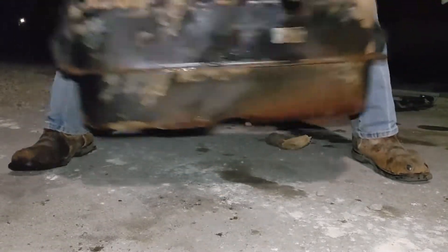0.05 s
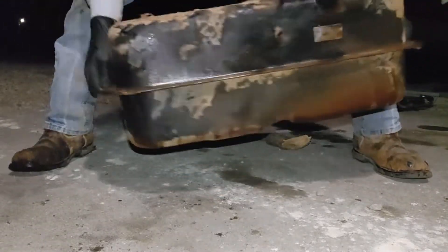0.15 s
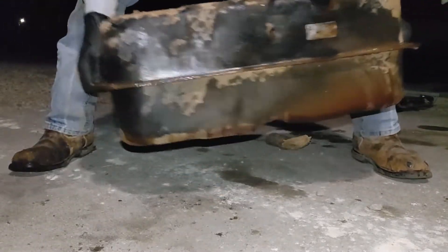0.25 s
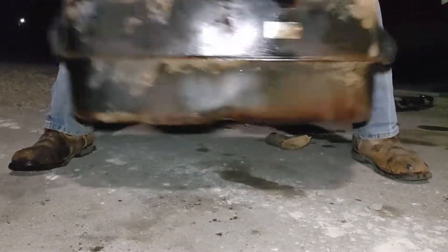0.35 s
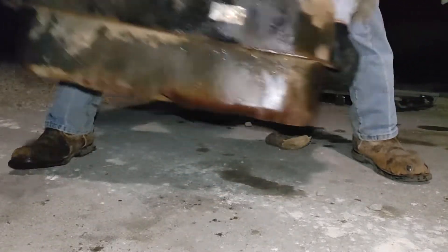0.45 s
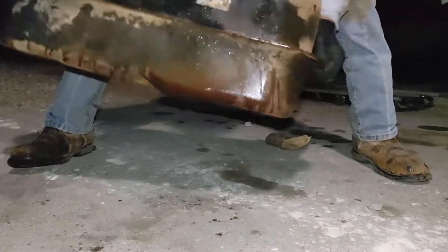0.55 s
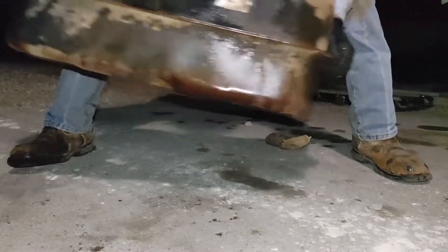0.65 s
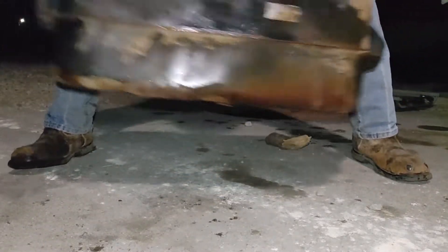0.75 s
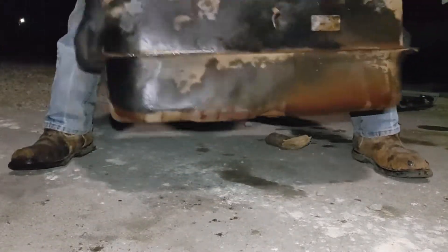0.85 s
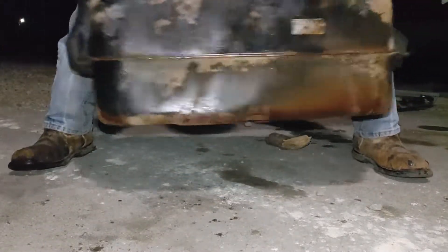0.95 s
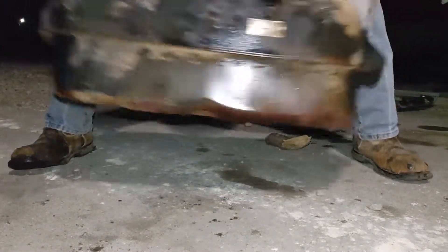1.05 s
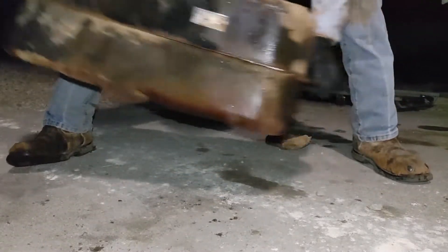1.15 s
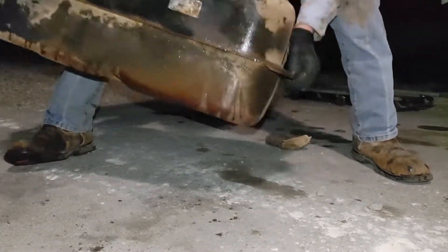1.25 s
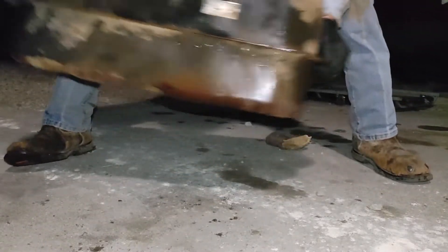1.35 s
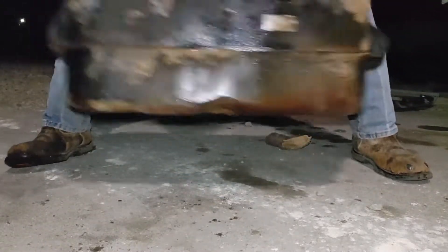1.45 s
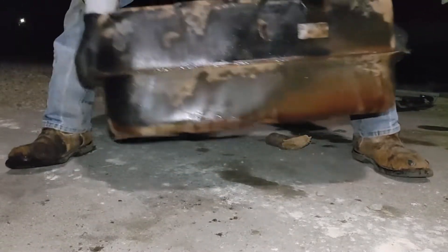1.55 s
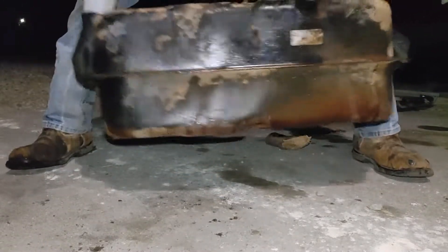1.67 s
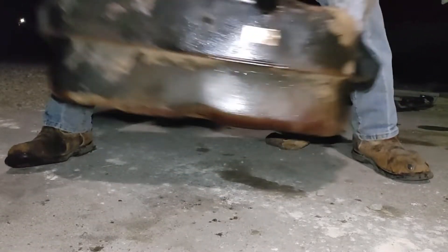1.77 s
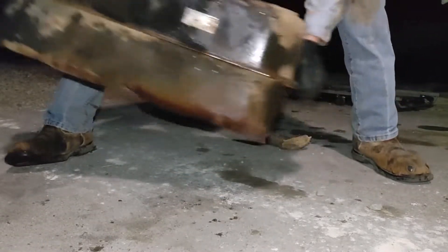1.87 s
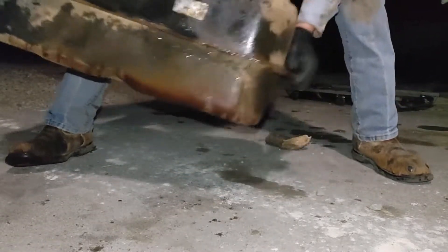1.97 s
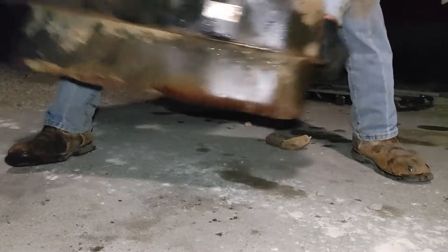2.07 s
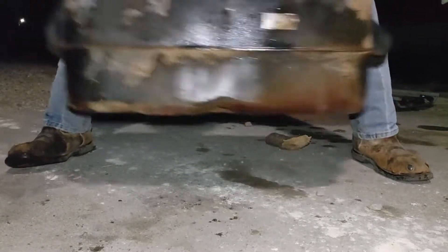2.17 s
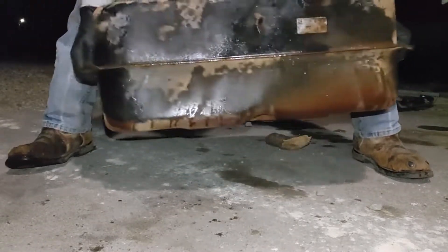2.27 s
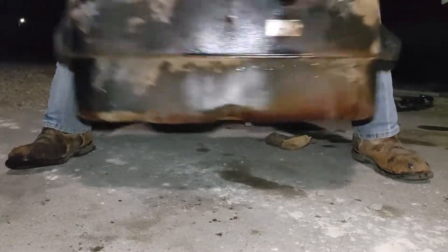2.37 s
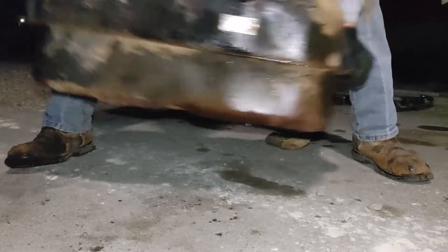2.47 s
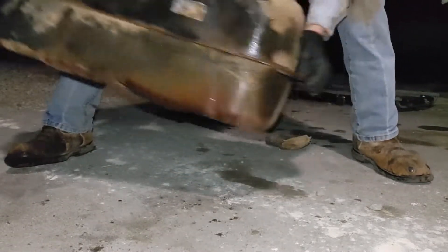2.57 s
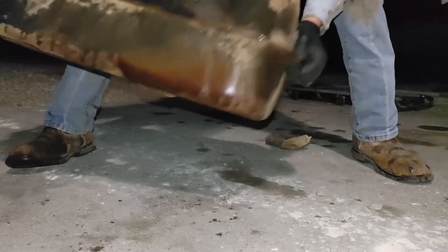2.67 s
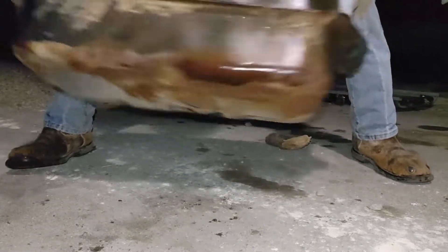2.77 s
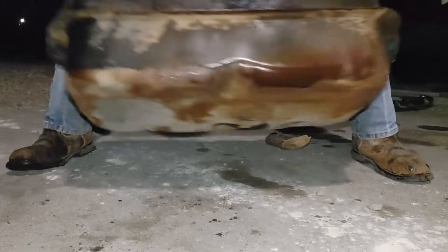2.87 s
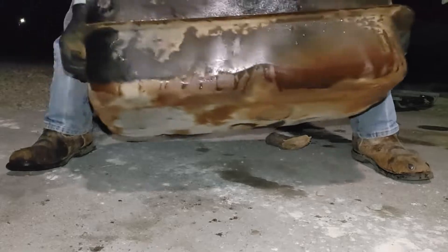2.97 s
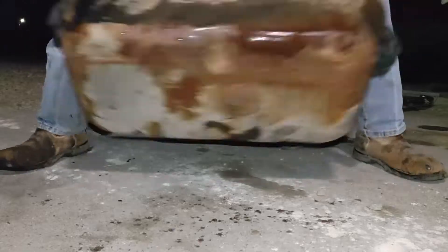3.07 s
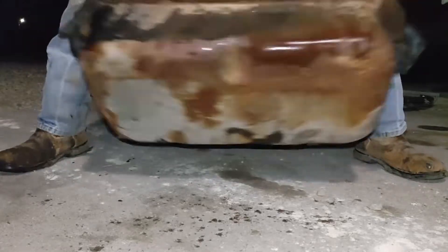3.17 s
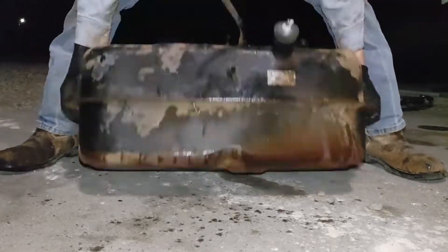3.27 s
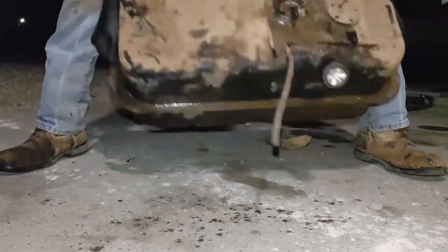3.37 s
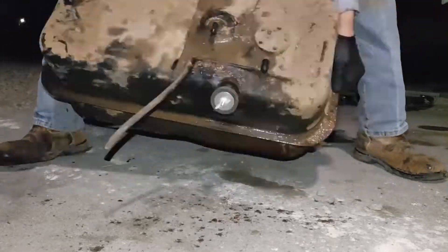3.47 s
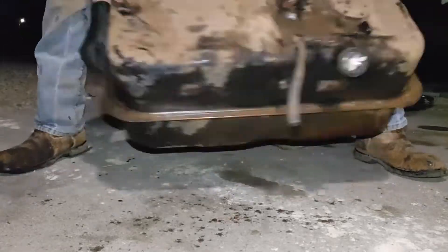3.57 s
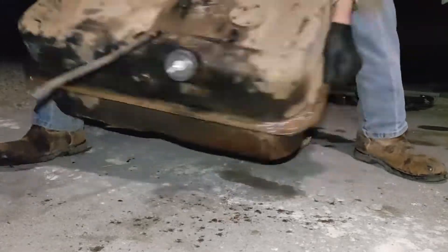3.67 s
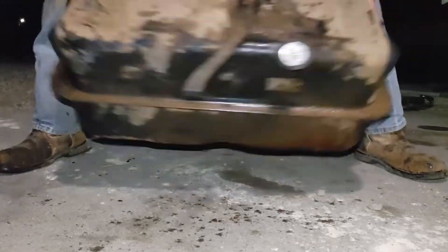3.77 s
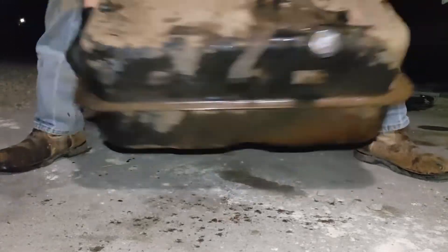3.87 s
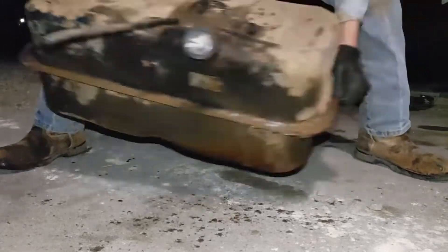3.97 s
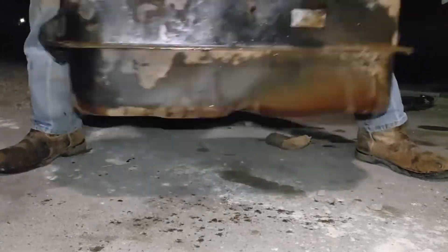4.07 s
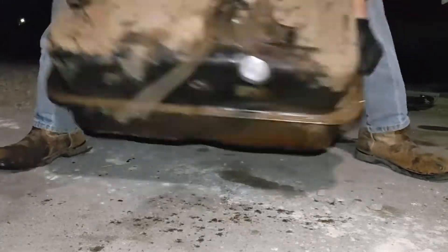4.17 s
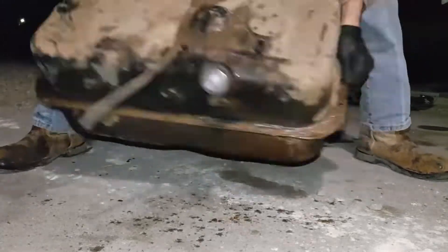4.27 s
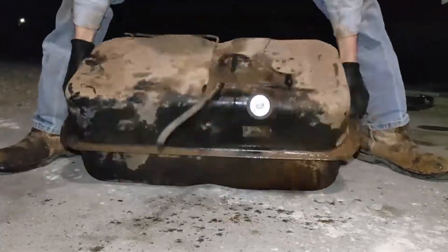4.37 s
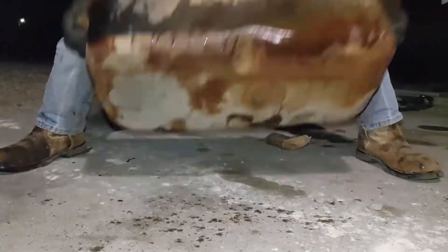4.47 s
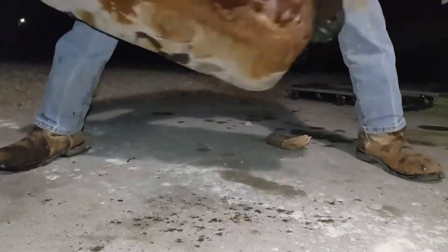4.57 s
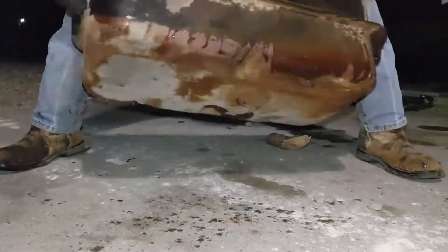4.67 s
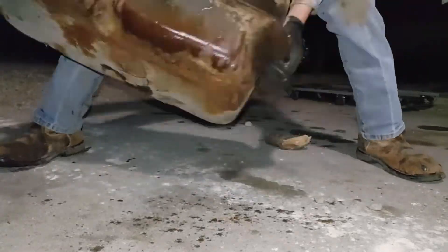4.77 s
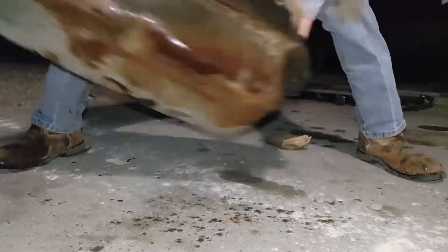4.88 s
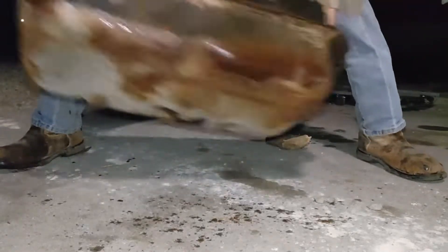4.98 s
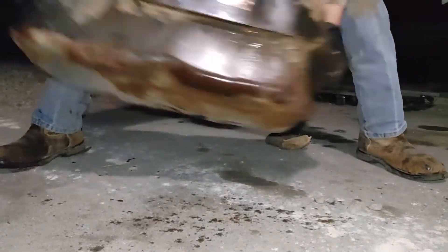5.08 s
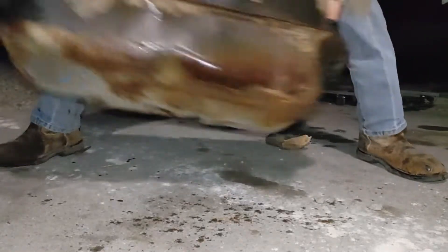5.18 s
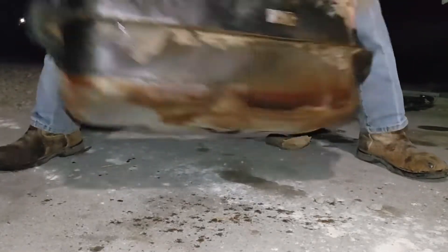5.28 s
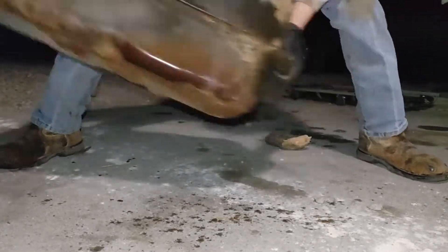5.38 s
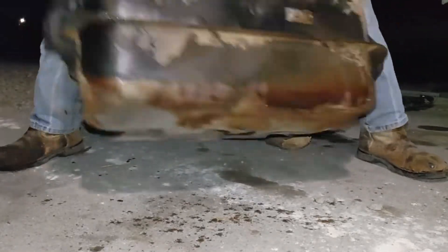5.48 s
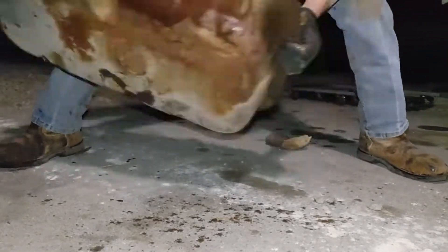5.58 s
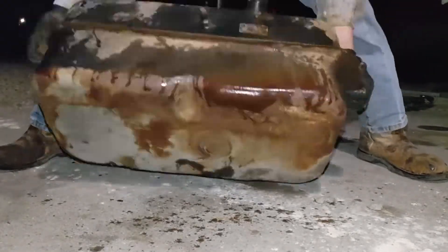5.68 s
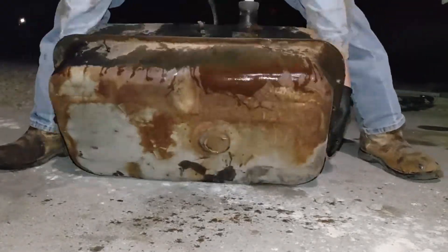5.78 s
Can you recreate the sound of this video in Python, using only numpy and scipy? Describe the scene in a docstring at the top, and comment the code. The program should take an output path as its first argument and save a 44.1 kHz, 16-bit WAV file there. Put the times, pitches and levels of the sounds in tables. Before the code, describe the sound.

A steel tank is swung slowly with liquid gulping and loose screws clacking inside, then shaken in a fast blurred rattle broken by dull knocks.

```python
"""A workshop, where a steel fuel tank holding liquid and loose screws is shaken by hand.
For three seconds it swings slowly: liquid gulps in the hollow, screws slide and clack on the walls.
Then the shaking races by in fast motion, a quick diffuse rattle, broken by dull knocks as the tank is turned over.
Liquid is filtered clouds of short rings plus single gulps; sliding screws are showers of tiny contacts on steel.
Clacks, clanks, thrown liquid and knocks are struck modes and noise, each placed at its own moment."""
import sys
import numpy as np
from scipy import signal
from scipy.fft import rfft, irfft, next_fast_len
from scipy.io import wavfile
from scipy.ndimage import uniform_filter1d

SR = 44100
rng = np.random.default_rng(int(sys.argv[2]) if len(sys.argv) > 2 else 0)


def wav_out(sig):
    """Save sig, one row per channel (or a flat mono array), as 16-bit PCM at SR to the path in sys.argv[1]."""
    wavfile.write(sys.argv[1], SR, np.round(np.clip(np.atleast_2d(sig).T, -1, 1) * 32767).astype(np.int16))


N = 257103
FAST_FROM_S = 3.02  # middle of the crossfade from slow swings to fast motion
TOP_HZ = 16100  # the band ends here

# Levels in the tables are relative: each source sets its final gain.

# Rumble of the heavy tank in fast motion and over the quiet room. Each row: frequency in Hz, density in dB per Hz.
RUMBLE_SPECTRUM = [(20, -8), (45, -6.5), (90, -2.5), (160, 0), (400, -52), (2000, -83), (16000, -77)]
# Low surge of the liquid in slow swings. Each row: frequency in Hz, density in dB per Hz.
SURGE_SPECTRUM = [(25, -34), (60, -20), (90, 12), (125, -13), (250, 0), (2000, -44)]

# Slow swings that send the liquid across the tank.
# Each row: start in seconds, length in seconds, slosh level in dB, splash level in dB.
SWINGS = [(0.003, 0.2, -27.5, -32.5), (0.3, 0.097, -29.5, -35), (0.71, 0.074, -27.5, -37),
          (0.951, 0.14, -24.5, -32), (1.399, 0.068, -27, -33.5), (1.628, 0.28, -27, -33.5),
          (2.093, 0.075, -24.5, -33), (2.316, 0.16, -27, -33.5), (2.754, 0.12, -27.5, -35.5),
          (3.005, 0.012, -31.5, -36.5)]
# How slosh, then splash, follow a swing. Each row: build-up in dB per second, settling in dB per second.
LIQUID_INERTIA = [(85, 48), (100, 65)]
# The liquid keeps moving between swings. One row: slosh level in dB, splash level in dB.
IDLE_LIQUID_DB = [-35.5, -45.5]
# The heap of screws slides as the floor tilts. Each row: start in seconds, length in seconds, level in dB.
SLIDES = [(-0.004, 0.24, -38), (0.29, 0.15, -39.5), (0.624, 0.17, -41), (0.945, 0.2, -37),
          (1.184, 0.18, -40.5), (1.4, 0.098, -40), (1.63, 0.21, -39.5), (1.875, 0.21, -40),
          (2.083, 0.083, -37), (2.323, 0.22, -39.5), (2.63, 0.49, -39)]
SLIP_DB_PER_S, GRIP_DB_PER_S = 133, 156  # a slide starts and stops
ROLL_DB = -46.5  # stragglers roll on
# Bouts of fast shaking, one group of rows each. Each row: time in seconds, liquid level in dB, screws level in dB.
BOUTS = [
    [(3.02, -31, -35.5), (3.24, -30.5, -38.5)],
    [(3.395, -31.5, -41.5), (3.5, -36.5, -34.5), (3.7, -30, -34), (3.92, -31, -33.5), (4.17, -29.5, -37),
     (4.32, -35, -37.5)],
    [(4.48, -30, -38), (4.75, -30, -33.5), (5.08, -26, -34), (5.3, -28, -34.5), (5.62, -27.5, -33.5),
     (5.692, -38, -41.5)],
]
START_DB_PER_S, STOP_DB_PER_S, REST_DB = 906, 694, -59  # a bout starts and stops; what stirs between bouts
CHURN_DB, SPLASH_DB = -2.5, -5.5  # fast shaking: churn against the bout's liquid level, splash against churn

# Liquid in the hollow during slow swings. Each row: frequency in Hz, density in dB per Hz.
HOLLOW_SPECTRUM = [(30, -70), (60, -24), (95, -26.5), (130, -24), (180, -8), (240, -4.5), (280, 0),
                   (320, -2.5), (420, -3.5), (600, -7), (900, -22.5), (1600, -34)]
# Liquid churning between throws in fast motion. Each row: frequency in Hz, density in dB per Hz.
CHURN_SPECTRUM = [(30, -49), (60, -15), (130, -20.5), (180, -9), (240, -4.5), (280, 0), (420, -3.5),
                  (600, -6.5), (900, -15), (1600, -43)]
# Spray and wet slaps. Each row: frequency in Hz, density in dB per Hz.
SPLASH_SPECTRUM = [(300, -6.5), (600, 0.5), (1000, -3.5), (1300, -5.5), (2000, -4.5), (4000, -29),
                   (9000, -54)]
# Single heavy gulps in the hollow.
# Each row: centre in seconds, level in dB, pitch at the centre in Hz, half width (sigma) in seconds.
GULPS = [(0.04, -25, 286, 0.013), (0.082, -21, 282, 0.02), (0.155, -28, 227, 0.014),
         (0.179, -27.5, 298, .01), (0.254, -25, 282, 0.0058), (0.37, -27.5, 332, 0.01),
         (0.438, -22, 268, 0.0099), (0.625, -28, 255, 0.012), (0.709, -25.5, 282, 0.0091),
         (0.767, -22, 276, 0.0099), (0.835, -25, 287, 0.0077), (0.938, -24.5, 286, .012),
         (1.017, -25, 340, 0.0073), (1.05, -41, 90, 0.018), (1.097, -20.5, 282, 0.019),
         (1.125, -38, 92, .012), (1.153, -21.5, 238, 0.006), (1.41, -29, 280, 0.02),
         (1.474, -22.5, 283, 0.012), (1.53, -22, 294, 0.011), (1.675, -23.5, 288, .014),
         (1.685, -29.5, 437, 0.017), (1.716, -19.5, 289, 0.0082), (1.814, -25, 290, 0.0099),
         (1.847, -26, 265, 0.0072), (1.9, -26, 291, 0.011), (2.013, -26, 314, 0.0099),
         (2.103, -25, 453, 0.011), (2.132, -25, 275, .01), (2.183, -25, 293, 0.012), (2.24, -25, 274, .009),
         (2.295, -26, 302, 0.0085), (2.405, -23.5, 281, 0.024), (2.475, -40, 100, 0.0095),
         (2.48, -23, 285, 0.0074), (2.511, -24.5, 288, 0.0074), (2.819, -25.5, 288, 0.014),
         (2.881, -25, 320, 0.0064), (3.008, -24, 288, 0.0073)]
# Modes of a gulp. Each row: ratio to its pitch, level in dB.
GULP_MODES = [(0.68, -15), (1, -0.5), (1.45, -16)]
GULP_RISE_PER_S, GULP_ROUGH = 1, 0.17  # share of the pitch gained per second; froth against the note
# Liquid thrown against a wall. Each row: start in seconds, level in dB, panel pitch in Hz.
THROWS = [(3.058, -16, 316), (3.217, -21, 328), (3.406, -15.5, 284), (3.531, -21, 312), (3.596, -17, 295),
          (3.658, -19, 318), (3.722, -17, 334), (3.786, -16, 308), (3.844, -22, 360), (3.906, -12.5, 290),
          (3.971, -13, 281), (4.03, -18, 295), (4.06, -14, 288), (4.091, -16, 310), (4.161, -18, 293),
          (4.21, -21.5, 318), (4.499, -15, 285), (4.534, -24, 283), (4.724, -16, 292), (4.817, -17, 276),
          (4.883, -18.5, 277), (4.939, -18.5, 306), (5.056, -10, 287), (5.124, -12.5, 230),
          (5.194, -12.5, 257), (5.267, -24, 318), (5.327, -24, 340), (5.409, -15, 278), (5.498, -15.5, 284),
          (5.54, -18.5, 526)]
THUMP_DB, THUMP_T60_S, THUMP_RISE_S = 0.5, 0.043, 0.00228  # the thump of thrown liquid
SLAP_DB = -5.5  # its wet slap

# Modes of the steel wall before each spot detunes them. Each entry: frequency in Hz.
STEEL_MODES = [1020, 1270, 1640, 1992, 2180, 2400, 2555, 2810, 3050, 3376, 3586, 3773, 3891, 4101, 4477,
               4945, 5227, 5900, 6600, 8580, 9150, 10335, 11700]
# Screws tumbling and clinking in slow swings. Each row: frequency in Hz, density in dB per Hz.
SLIDE_SPECTRUM = [(600, -22), (1400, -8), (2000, -3), (2600, -2), (3300, -5), (4100, -5.5), (5000, -9),
                  (6700, -10), (10000, -27), (16000, -12.5)]
# Rasp of screws on wet steel. Each row: frequency in Hz, density in dB per Hz.
RASP_SPECTRUM = [(700, -22), (1500, -5), (2000, -2), (2700, 2), (3500, -6), (6500, -13), (9000, -43),
                 (16000, -35)]
# Sharp edge of a hard-running slide. Each row: frequency in Hz, density in dB per Hz.
SCRAPE_SPECTRUM = [(2000, -33), (4500, -2), (9000, 9), (16000, -4)]
# Screws in fast motion. Each row: frequency in Hz, density in dB per Hz.
RATTLE_SPECTRUM = [(600, -19.5), (1300, -8.5), (1800, -5.5), (2600, -2.5), (3300, -3.5), (4000, -2),
                   (5000, -4), (6700, -3.5), (10000, -2), (16000, -8.5)]
CLINK_DB, RASP_DB, JINGLE_DB = -5, -3.5, -7  # clinks and rasp against tumbling; jingle against rattle
# the scrape has SCRAPE_DB at a typical slide and grows as this power of the slide's gain
SCRAPE_DB, SCRAPE_GROWS, TYPICAL_SLIDE_DB = -7.5, 1.15, -39
# Quick strokes that land the heap of screws. Each row: centre in seconds, level in dB.
SHOWERS = [(3.062, -35.5), (3.09, -31), (3.226, -28), (3.389, -25.5), (3.42, -27), (3.474, -27.5),
           (3.53, -37), (3.597, -33), (3.668, -28.5), (3.728, -30), (3.789, -36), (3.848, -25),
           (3.911, -23), (3.975, -30), (4.035, -23.5), (4.1, -25.5), (4.159, -25), (4.212, -24),
           (4.267, -28), (4.493, -27), (4.557, -24.5), (4.634, -25.5), (4.701, -21), (4.76, -25.5),
           (4.827, -21), (4.89, -20.5), (4.958, -18), (5.026, -21.5), (5.092, -20), (5.141, -24),
           (5.165, -26), (5.231, -21.5), (5.299, -24.5), (5.369, -23.5), (5.437, -21.5), (5.509, -21.5),
           (5.574, -21), (5.621, -24)]
SHOWER_S = 0.0057  # half width (sigma) of a shower
REBOUND_S, REBOUND_DB = 0.029, -9  # the back stroke lands a lighter shower

# Dry clicks. Each row: start in seconds, level in dB.
TICKS = [(3.0211, -4), (3.0641, -2.5), (3.1056, -3.5), (3.149, -3.5), (3.1921, -5.5)]
# Screws clanking on a panel. Each row: start in seconds, level in dB, pitch in Hz, 60 dB decay in seconds.
CLANKS = [(0.066, -28, 1040, .05), (0.141, -30, 1060, .05), (0.204, -31, 1010, 0.055),
          (0.759, -25.5, 836, 0.059), (0.941, -26.5, 990, .04), (0.976, -26, 955, 0.053),
          (1.126, -28, 1100, .04), (1.401, -25, 1227, 0.061), (1.468, -27.5, 1215, .05),
          (1.708, -26, 1290, .05), (1.775, -23, 1220, .06), (1.835, -30, 1000, .06),
          (1.885, -26, 1046, .06), (2.104, -26, 1140, .05), (2.137, -24, 1243, 0.069),
          (2.191, -28, 995, 0.055), (2.337, -28, 1020, .05), (2.427, -30, 990, 0.044),
          (3.302, -15, 950, .025), (3.3215, -31, 2540, 0.019), (4.3532, -20, 3570, .014),
          (4.353, -23, 2440, .016), (4.354, -12, 990, 0.016), (4.4084, -15.5, 2485, 0.02),
          (4.409, -26, 3850, 0.022), (4.421, -25, 2030, .024), (5.7617, -31, 1750, 0.021),
          (5.79, -40, 1780, 0.041)]
# Modes of a clank. Each row: ratio to its pitch, level in dB.
CLANK_MODES = [(0.88, -7), (1, -1.5), (1.11, -6.5), (1.52, -14), (2.07, -14)]
CLANK_RISE_S = 0.00099
# The hardest single screws hitting a wall. Each row: start in seconds, level in dB,
# brightness from 4840 to 7000 Hz in dB, sparkle from 9000 Hz up in dB.
CLACKS = [(0.061, -13, 2, -2), (0.0749, -17, 5, 5), (0.1378, -23, -4, -6), (0.1464, -12.5, -1, -5),
          (0.321, -25, 5, 7), (0.38, -14.5, 4, -6), (0.402, -13, -4, -8), (0.43, -19, -9, -14),
          (0.465, -7.5, -3, -2.5), (0.518, -15.5, -0.5, -13), (0.7267, -12, -21, -23),
          (0.7528, -11.5, -7, -15), (0.818, -11.5, -7, -17), (0.9392, -5.5, -1.5, 1.5),
          (0.976, -6.5, -1, -2), (1.0179, -13, 5, 2), (1.0354, -9, 7, 9), (1.0444, -7, -3, -1),
          (1.089, -8, -9, -13), (1.1184, -4.5, -2.5, -8), (1.1317, -12, 2, -2), (1.1663, -14, -1.5, -13),
          (1.1949, -8, -16, -28), (1.3, -18, 7, -12), (1.4512, -11, 1, -17), (1.5882, -16.5, -0.5, -8),
          (1.6928, -14, 3.5, 0), (1.7057, -15.5, -2, -3), (1.7732, -14, 5, 4.5), (2.038, -14.5, -7, -11),
          (2.1314, -12.5, -5, -5), (2.1611, -6, -20, -9), (2.185, -10.5, -5, -5), (2.219, -5.5, -5, -2),
          (2.233, -12, -14, -8), (2.2474, -8, 4.5, 4), (2.315, -10.5, 1, 3), (2.3637, -14, 6.5, 9.5),
          (2.4243, -23, 4, 5), (4.4908, -5.5, -30, -6)]
# Clack before its brightness is set. Each row: frequency in Hz, density in dB per Hz.
CLACK_SPECTRUM = [(500, -7.5), (1400, -10.5), (2400, 2), (3500, -2.5), (5200, -5), (6700, -6), (10000, -3),
                  (16000, -15.5)]
SCREW_RING_DB, SCREW_RING_T60_S = -15, 0.026  # a screw's own ring after a clack

# Blows on the tank's panels. Each row: start in seconds, level in dB, pitch in Hz,
# 60 dB decay in seconds, crack level against the boom in dB.
KNOCKS = [(3.14, -29, 50, .11, -36), (3.259, -2, 264, 0.059, -14), (3.2604, -15.5, 520, 0.02, -21),
          (3.272, -15, 333, 0.03, -10), (3.3015, -10, 530, 0.018, -5.5), (3.3038, -1, 470, 0.028, -19.5),
          (3.3075, -5.5, 249.5, 0.055, -38), (3.3185, -7.5, 272, 0.043, -15.5),
          (3.333, -24, 300, .025, -14), (3.363, -30, 1110, 0.031, -21), (3.366, -24, 343, 0.07, -29),
          (3.382, -25.5, 1280, 0.015, -1), (4.333, -20, 52, 0.1, -31), (4.3531, -10.5, 192, 0.032, -2.5),
          (4.3607, -1, 278, 0.062, -42), (4.367, -18, 520, 0.027, -34), (4.3856, -25.5, 410, 0.03, 4),
          (4.4087, -12.5, 510, .045, -4.5), (4.4205, -6.5, 384, 0.02, -15), (4.4806, -22.5, 393, 0.053, 1),
          (4.591, -9, 242, 0.035, -15), (4.598, -16, 224, 0.021, -30), (4.6093, -10.5, 283, 0.013, -30),
          (4.63, -13, 80, 0.04, -38), (4.669, -14.5, 184, 0.028, -30), (4.9872, -5.5, 289, 0.027, -24),
          (5.728, -31, 170, .03, -19), (5.7625, -32, 252, 0.025, 5.5), (5.767, -20, 112, 0.052, -44)]
# Crack at the contact of a blow. Each row: frequency in Hz, density in dB per Hz.
CRACK_SPECTRUM = [(30, -14), (150, 21.5), (500, 8.5), (1000, -4), (1600, -5.5), (2600, -11), (4000, -14.5),
                  (7000, -14.5), (16000, -10)]
CRACK_RISE_S = 0.0009
# Modes of a panel. Each row: ratio to its pitch, level in dB, share of its decay time.
PANEL_MODES = [(1, 1.5, 1), (1.95, -11, 0.94), (2.3, -24.5, 0.39), (3.4, -36, 0.85)]
STRETCH, STRETCH_S = 0.22, 0.0046  # a struck panel starts sharp by this share; time constant of its sinking back
CLATTER_DB = -14


def amp(db):
    """Decibels to gain."""
    return 10 ** (np.asarray(db) / 20)


def unit(x):
    """Scale to rms 1."""
    return x / np.sqrt(np.mean(x ** 2) + 1e-20)


def clock():
    """The time of every sample in seconds."""
    return np.arange(N) / SR


def noise(length):
    """Two unrelated tracks of white noise."""
    return rng.standard_normal((2, length))


def add(track, s, sound):
    """Mix a stereo sound in at time s."""
    i = max(round(s * SR), 0)
    track[:, i:i + sound.shape[1]] += sound[:, :N - i]


def colour(x, points):
    """Causal minimum-phase filter through (Hz, dB) points, its phase found by folding the cepstrum."""
    n = x.shape[-1]
    m = 2 * next_fast_len(n // 2 + 2048)
    f, db = np.transpose(points)
    gain = amp(np.interp(np.log(np.fft.rfftfreq(m, 1 / SR) + 1), np.log(f), db))
    cepstrum = irfft(np.log(gain), m)
    cepstrum[1:m // 2] *= 2
    cepstrum[m // 2 + 1:] = 0
    response = np.exp(rfft(cepstrum))
    return irfft(rfft(x, m) * response, m)[..., :n]


def steady(x, span):
    """Level a texture to rms 1 over span seconds, keeping its fine grain."""
    power = np.mean(x ** 2, axis=0)
    for _ in range(2):
        power = uniform_filter1d(power, max(int(span * SR), 1))
    return x / np.sqrt(np.abs(power) + 1e-20)


def spread(pair, side_db):
    """Two signals become the middle and the side of a left and right pair."""
    middle, side = pair[0], amp(side_db) * pair[1]
    return np.array([middle + side, middle - side]) / np.sqrt(1 + amp(side_db) ** 2)


def bump(s, width):
    """A bell of height 1 around time s."""
    return np.exp(-.5 * np.minimum(np.abs(clock() - s) / width, 10) ** 2)


def outside(start, end, rise, fall):
    """The dB lost before start and after end, at so many dB per second."""
    t = clock()
    return rise * np.maximum(start - t, 0) + fall * np.maximum(t - end, 0)


def fast():
    """0 during the slow swings, 1 in fast motion."""
    return np.clip((clock() - FAST_FROM_S) / .02 + .5, 0, 1)


def impacts(rate, scatter_db):
    """Random contacts of uneven strength, rate per second."""
    count = int(rate * N / SR)
    strength = np.clip(rng.standard_normal(count), -2, 2)
    return np.bincount(rng.integers(0, N, count), amp(scatter_db * strength), N)


def pings(rate, centre_hz, octaves, cycles, scatter_db, rise, size=600):
    """Random short rings on two unrelated tracks, losing 60 dB in so many cycles; a positive rise lifts the pitch."""
    count = int(rate * N / SR)
    k = np.arange(size)
    tracks = []
    for _ in range(2):
        pitch, strength = np.clip(rng.standard_normal((2, count, 1)), -2, 2)
        turns = (centre_hz * 2 ** (octaves * pitch) / SR).astype(np.float32) * k.astype(np.float32)
        age = turns / float(cycles)
        decay = np.exp(-float(np.log(1000)) * age) * (1 - np.exp(-2 * turns))
        wave = amp(scatter_db * strength) * decay * np.sin(2 * np.pi * turns * (1 + float(rise) * age))
        places = rng.integers(0, N, (count, 1)) + k
        tracks.append(np.bincount(places.ravel(), wave.ravel(), N)[:N])
    return np.array(tracks)


def shell(t60, ring_db, ring_t60):
    """One spot of the steel wall: a short crack, then its own mix of slightly detuned wall modes and noise."""
    t = np.arange(SR // 8) / SR
    loading = 1 + .012 * rng.standard_normal(len(STEEL_MODES))
    modes = np.sin(2 * np.pi * np.outer(STEEL_MODES * loading, t))
    ring = unit(noise(len(STEEL_MODES)) @ modes) + 2.65 * noise(len(t))
    crack = noise(len(t)) * amp(-60 * t / t60)
    return crack + ring * amp(ring_db - 60 * t / ring_t60)


def screws(rate, scatter_db, t60, ring_db, count=7):
    """Many small contacts shared among several spots of the wall."""
    total = np.zeros((2, N))
    for _ in range(count):
        contacts = impacts(rate / count, scatter_db)[None]
        total += signal.oaconvolve(contacts, shell(t60, ring_db, ring_t60=0.075), axes=1)[:, :N]
    return total


def panel(hz, t60, rise):
    """A panel booms in a few modes whose pitch sinks as its swing dies; its neighbours clatter faintly."""
    t = np.arange(SR // 8) / SR
    turns = hz * (t + STRETCH * STRETCH_S * (1 - np.exp(-t / STRETCH_S)))
    boom = np.zeros((2, len(t)))
    for ratio, db, life in PANEL_MODES:
        # a second version, 14 % sharper, feeds the side
        boom += amp(db - 60 * t / (t60 * life)) * np.sin(2 * np.pi * np.outer([1, 1.14], ratio * turns))
    boom = spread(boom, side_db=-5.5)[rng.permutation(2)]  # left and right swap at random
    clatter_spectrum = [(hz / 4, -25), (hz, 0), (hz * 2, -4), (hz * 4, -30), (hz * 20, -56)]
    clatter = unit(colour(noise(len(t)), clatter_spectrum))
    return (boom + amp(CLATTER_DB - 60 * t / t60) * clatter) * (1 - np.exp(-t / rise))


def clank(hz, t60):
    """Struck steel rings briefly in a cluster of close modes."""
    t = np.arange(SR // 8) / SR
    ratio, level = np.transpose(CLANK_MODES)
    phase = rng.random((len(ratio), 1)) + .2 * rng.standard_normal((2, len(ratio), 1))
    ring = unit(amp(level) @ np.sin(2 * np.pi * (np.outer(ratio * hz, t) + phase)))
    return amp(-60 * t / t60) * (1 - np.exp(-t / CLANK_RISE_S)) * ring


def swings():
    """Slow swings: slosh and splash (dB) each build up, hold and settle to a quiet wash."""
    levels = []
    for k, (rise, fall) in enumerate(LIQUID_INERTIA):
        each = [db[k] - outside(s, s + length, rise, fall) for s, length, *db in SWINGS]
        levels.append(np.maximum(IDLE_LIQUID_DB[k], np.max(each, axis=0)))
    return levels


def slides():
    """Level of the sliding screws (dB): they slip, run and come to rest."""
    each = [db - outside(s, s + length, SLIP_DB_PER_S, GRIP_DB_PER_S) for s, length, db in SLIDES]
    return np.maximum(ROLL_DB, np.max(each, axis=0))


def vigour():
    """Fast shaking: liquid and screws (dB), nearly at rest between bouts."""
    levels = np.full((2, N), float(REST_DB))
    for rows in BOUTS:
        s, *columns = np.transpose(rows)
        fade = outside(s[0], s[-1], START_DB_PER_S, STOP_DB_PER_S)
        levels = np.maximum(levels, [np.interp(clock(), s, db) - fade for db in columns])
    return levels


def shaking():
    """Gains of slosh, splash and sliding screws: slow swings, then the churning between quick strokes."""
    liquid_db, screws_db = vigour()
    churn_db = liquid_db + CHURN_DB
    slow_gains = amp([*swings(), slides()])
    fast_gains = amp([churn_db, churn_db + SPLASH_DB, screws_db])
    return (1 - fast()) * slow_gains + fast() * fast_gains


def rumble(slosh):
    """The heavy tank rumbles as the liquid surges, over a quiet room."""
    low = unit(colour(noise(N), RUMBLE_SPECTRUM))
    surge = spread(unit(colour(noise(N), SURGE_SPECTRUM)), side_db=-14)
    room_and_tank = low * (amp(-62) + slosh * fast() * amp(-12.0))
    return room_and_tank + surge * slosh ** 2 * (1 - fast()) * amp(6.0)


def ticks():
    """Five dry ticks with no ring, two samples each, mark the start of the fast motion."""
    out = np.zeros((2, N))
    for s, db in TICKS:
        add(out, s, amp(db + 2.0) * np.tile([1, .5], (2, 1)))
    return out


def knocks():
    """Each blow: a crack at the contact and one panel's boom."""
    out = np.zeros((2, N))
    for s, db, hz, t60, crack_db in KNOCKS:
        crack = colour(shell(t60=0.021, ring_db=-20.5, ring_t60=0.095), CRACK_SPECTRUM)
        crack = crack * (1 - np.exp(-np.arange(crack.shape[1]) / SR / CRACK_RISE_S))
        crack = crack / np.abs(crack).max()
        boom = panel(hz, t60, rise=0.00052)
        add(out, s, amp(db) * (boom + amp(crack_db + 10.5) * crack))
    return out


def clanks():
    """A screw lands flat on a panel and rings it."""
    out = np.zeros((2, N))
    for s, db, hz, t60 in CLANKS:
        add(out, s, amp(db) * clank(hz, t60))
    return out


def clacks():
    """A screw strikes bare steel with its head, then its shank, and rings on its own pitch."""
    hits, rings = np.zeros((2, 2, N))
    for s, db, bright_db, sparkle_db in CLACKS:
        tilt_hz, tilt_db = [2680, 4840, 7000, 9000], [0, bright_db, bright_db, sparkle_db]
        spectrum = [(hz, level + np.interp(hz, tilt_hz, tilt_db)) for hz, level in CLACK_SPECTRUM]
        head, shank = (.0018, 0), (rng.uniform(0.0042, 0.0083), -7)  # delay in s, level in dB
        for delay, drop_db in [head, shank]:
            hit = colour(shell(t60=0.0064, ring_db=-27.0, ring_t60=0.12), spectrum)
            add(hits, s + delay, amp(db + drop_db + 2.5) * hit)
        ring = clank(rng.uniform(2100, 2897), SCREW_RING_T60_S)
        add(rings, s + 0.00178, amp(db + SCREW_RING_DB) * ring)
    return spread(hits, side_db=-1.0) + rings


def throws():
    """Thrown liquid thumps a panel and slaps the wall, on a freshly drawn spot each time."""
    out = np.zeros((2, N))
    for s, db, hz in THROWS:
        slap = colour(shell(t60=0.049, ring_db=-35, ring_t60=0.041), SPLASH_SPECTRUM)
        add(out, s, amp(db + THUMP_DB) * panel(hz, THUMP_T60_S, rise=THUMP_RISE_S))
        add(out, s + THUMP_RISE_S, amp(db + SLAP_DB) * slap / np.abs(slap).max())
    return out


def gulps():
    """Each heavy gulp swells and dies in the hollow on its own note, which climbs as the air pocket shrinks."""
    out = np.zeros((2, N))
    t = np.arange(SR // 5) / SR
    ratio, level = np.transpose(GULP_MODES)
    for s, db, hz, width in GULPS:
        age = t - min(s, .1)  # zero at the gulp's centre
        turns = hz * (age + GULP_RISE_PER_S * age ** 2 / 2)
        phase = rng.random((len(ratio), 1))
        note = amp(level) @ np.sin(2 * np.pi * (np.outer(ratio, turns) + phase))
        froth_spectrum = [(hz / 4, -30), (hz, 0), (hz * 2, -5), (hz * 4, -30), (hz * 20, -80)]
        froth = unit(colour(noise(len(t)), froth_spectrum))
        swell = np.exp(-.5 * (age / width) ** 2)
        add(out, s + age[0], amp(db) * swell * (unit(note) + GULP_ROUGH * froth))
    return out


def liquid(slosh, splash):
    """The wash booms in the tank's hollow; spray splashes above it, with ringing bubbles in the slow swings."""
    slow = 1 - fast()
    wash = pings(rate=650, centre_hz=334.5, octaves=0.86, cycles=5.44, scatter_db=1.0, rise=0.1, size=1000)
    slow_wash = steady(colour(wash, HOLLOW_SPECTRUM), span=0.035)
    fast_wash = steady(colour(wash, CHURN_SPECTRUM), span=0.12)
    wash = spread(slow * slow_wash + fast() * fast_wash, -10 * slow)  # wider in fast motion
    spray = pings(rate=600, centre_hz=1078, octaves=0.658, cycles=14.2, scatter_db=3.0, rise=0.099)
    bubbles = pings(rate=110, centre_hz=1108, octaves=0.372, cycles=70, scatter_db=0.0, rise=0.091, size=1500)
    drops = unit(spray) + amp(-3.5) * slow * unit(bubbles)
    drops = spread(steady(colour(drops, SPLASH_SPECTRUM), span=0.039), -7 * slow)
    return slosh * amp(0.35 + 3.13 * fast()) * wash + splash * amp(-1 + 1.8 * fast()) * drops


def slow_screws(level):
    """Screws tumble over the wet steel, rasp, clink together and scrape when they run hard."""
    tumble = screws(rate=300, scatter_db=5, t60=0.0035, ring_db=-18.5)
    tumble = steady(colour(tumble, SLIDE_SPECTRUM), span=.09)
    clinks = pings(rate=150, centre_hz=3000, octaves=0.55, cycles=70, scatter_db=3.5, rise=0, size=1500)
    clinks = steady(colour(clinks, SLIDE_SPECTRUM), span=0.098)
    rasp = unit(colour(noise(N), RASP_SPECTRUM))
    scrape = screws(rate=500, scatter_db=5, t60=0.0019, ring_db=-15, count=3)
    scrape = steady(colour(scrape, SCRAPE_SPECTRUM), span=0.044)
    scrape_gain = amp(SCRAPE_DB) * (level / amp(TYPICAL_SLIDE_DB)) ** SCRAPE_GROWS
    mix = tumble + amp(CLINK_DB) * clinks + amp(RASP_DB) * rasp + scrape_gain * scrape
    return spread(mix, side_db=-0.5)


def fast_screws():
    """In fast motion the many contacts blur into a rattle with a bright jingle."""
    rattle = screws(rate=1500, scatter_db=8.0, t60=0.0039, ring_db=-9.0)
    rattle = steady(colour(rattle, RATTLE_SPECTRUM), span=0.049)
    jingle = pings(rate=420, centre_hz=4000, octaves=0.65, cycles=55, scatter_db=4, rise=0, size=1000)
    return rattle + amp(JINGLE_DB) * steady(colour(jingle, RATTLE_SPECTRUM), span=0.12)


def sliding(level):
    """The heap of screws follows the shaking, slow texture first, then the fast one."""
    return level * (amp(2.5) * (1 - fast()) * slow_screws(level) + amp(5.5) * fast() * fast_screws())


def strokes():
    """Each quick stroke lands the heap of screws in one short shower, the back stroke in a lighter one."""
    forth = sum(amp(db) * bump(s, SHOWER_S) for s, db in SHOWERS)
    back = amp(REBOUND_DB) * np.interp(clock() - REBOUND_S, clock(), forth)
    shower = screws(rate=1600, scatter_db=5.5, t60=0.01, ring_db=-14)
    return np.hypot(forth, back) * steady(colour(shower, RATTLE_SPECTRUM), span=0.014)


def scene():
    """The room and tank rumble, single hits, liquid and screws together."""
    slosh, splash, slide = shaking()
    hits = ticks() + knocks() + clanks() + clacks()
    wet = throws() + gulps() + liquid(slosh, splash)
    return rumble(slosh) + hits + wet + sliding(slide) + strokes()


def record(dry):
    """The microphone's treble steps down near 7 kHz; peaks clip at full scale; the band ends steeply."""
    m = next_fast_len(N + 4096)
    hz = np.fft.rfftfreq(m, 1 / SR)
    shelf = amp(-11.5 * np.clip((hz - 6950) / 600, 0, 1))
    clipped = np.clip(irfft(rfft(dry, m) * shelf, m), -1, 1)
    return irfft(rfft(clipped) * (hz < TOP_HZ), m)[:, :N]


dry = scene()
out = record(dry)
wav_out(out)
```